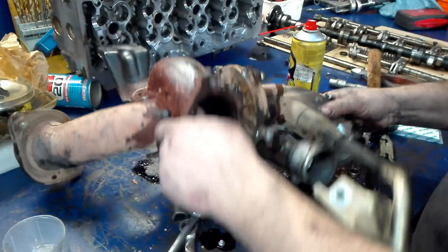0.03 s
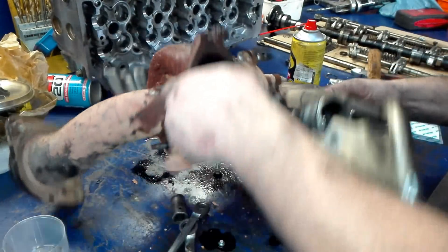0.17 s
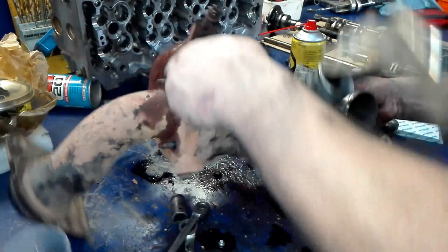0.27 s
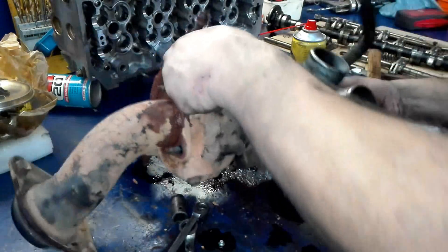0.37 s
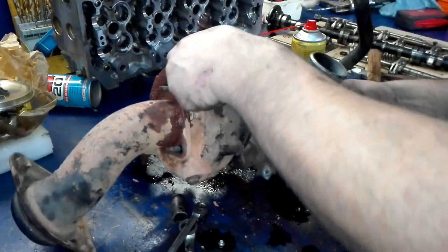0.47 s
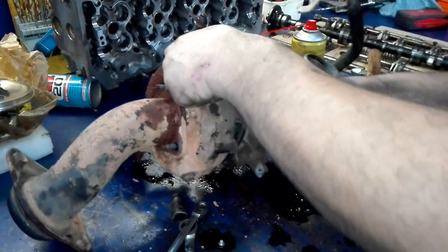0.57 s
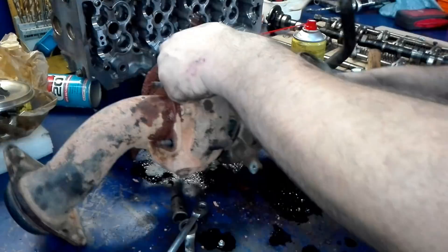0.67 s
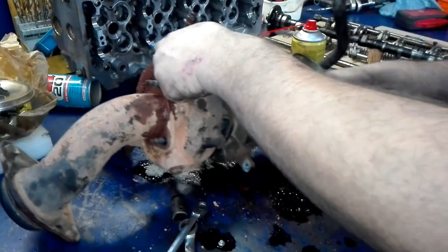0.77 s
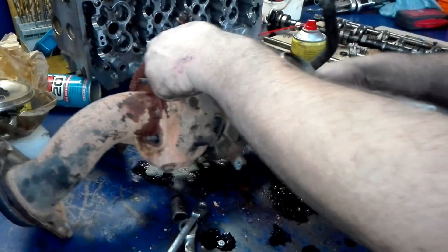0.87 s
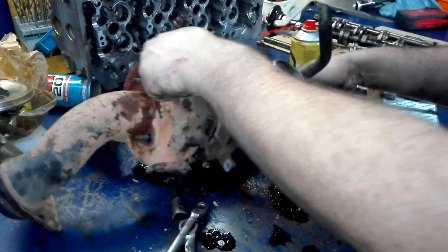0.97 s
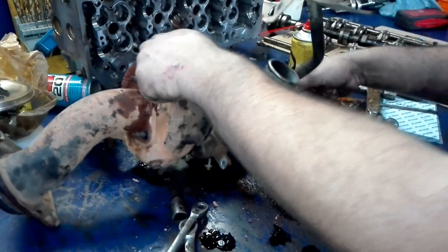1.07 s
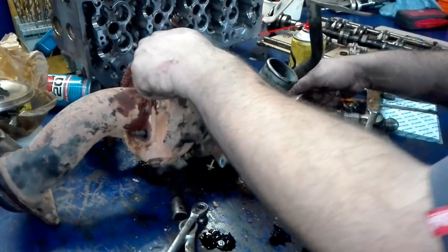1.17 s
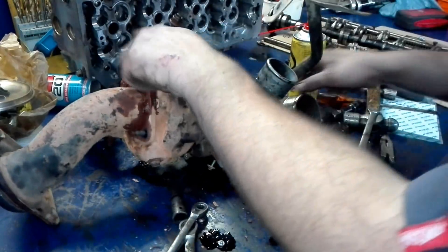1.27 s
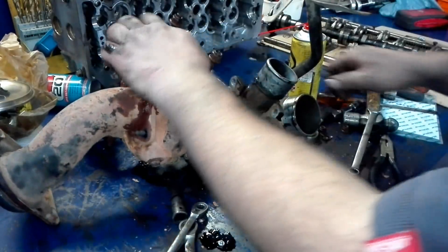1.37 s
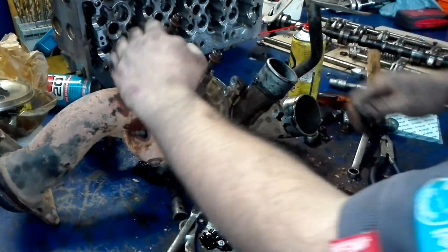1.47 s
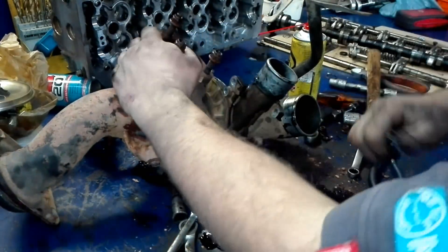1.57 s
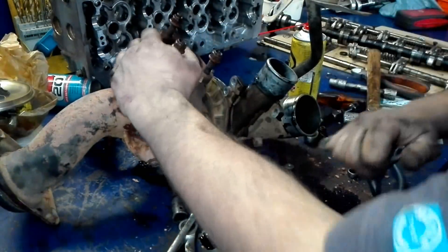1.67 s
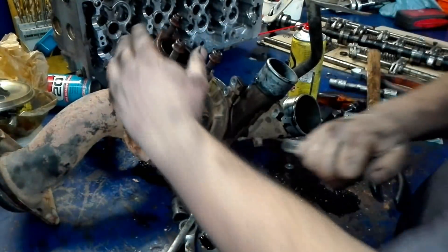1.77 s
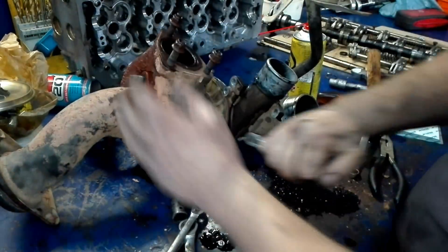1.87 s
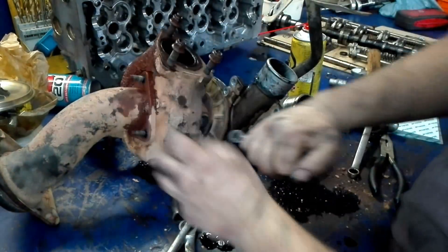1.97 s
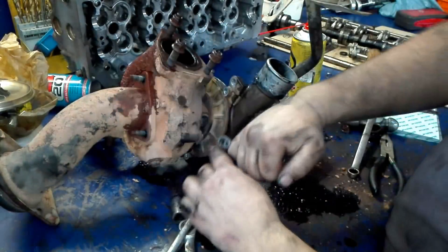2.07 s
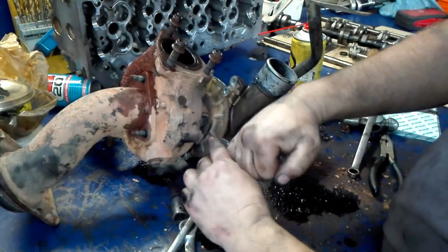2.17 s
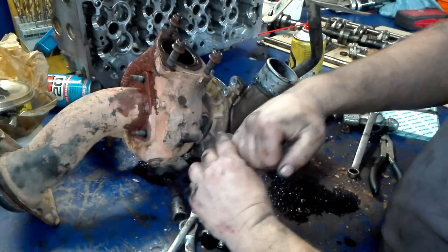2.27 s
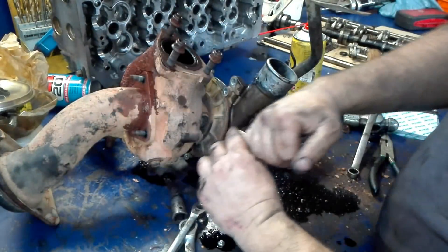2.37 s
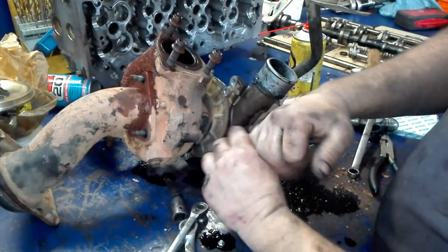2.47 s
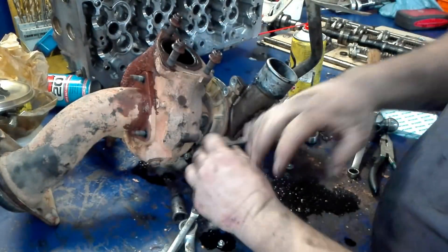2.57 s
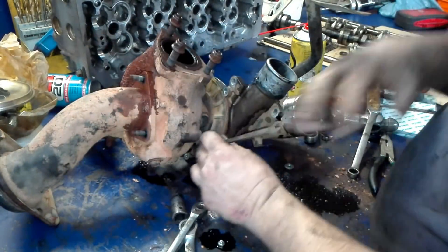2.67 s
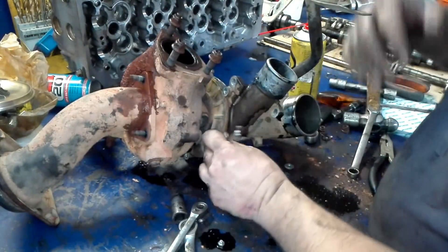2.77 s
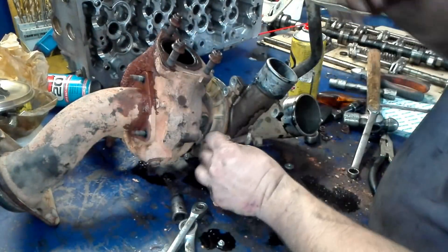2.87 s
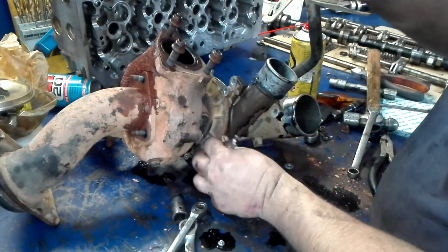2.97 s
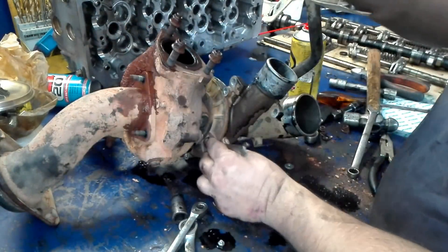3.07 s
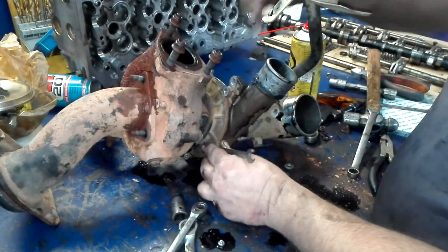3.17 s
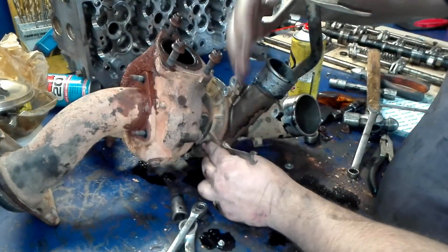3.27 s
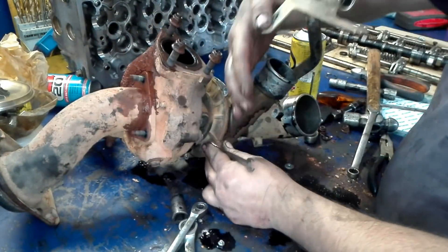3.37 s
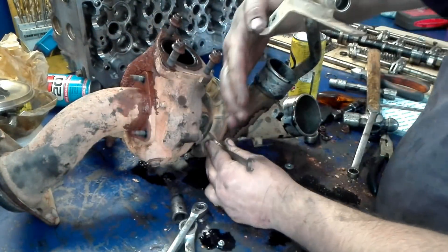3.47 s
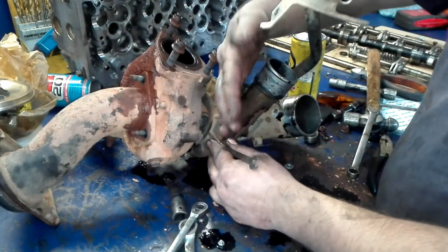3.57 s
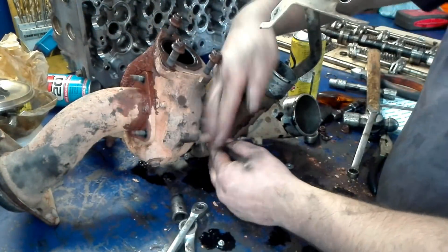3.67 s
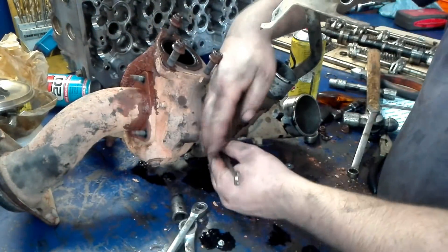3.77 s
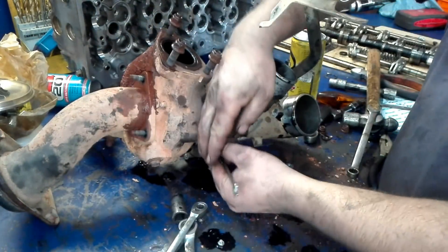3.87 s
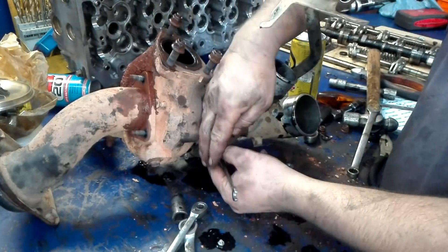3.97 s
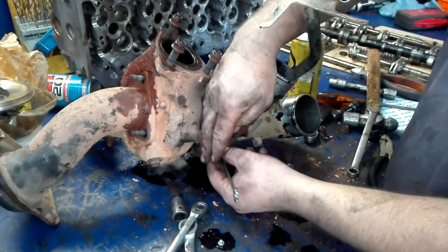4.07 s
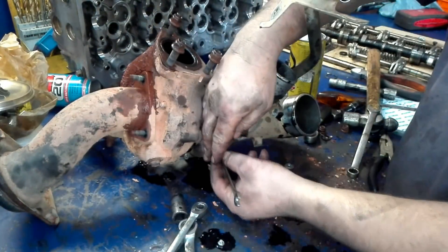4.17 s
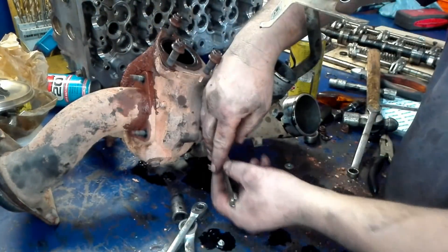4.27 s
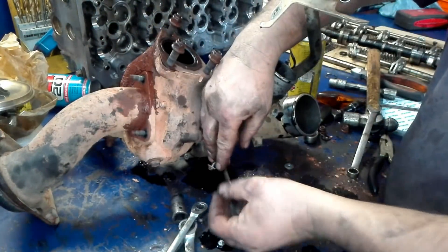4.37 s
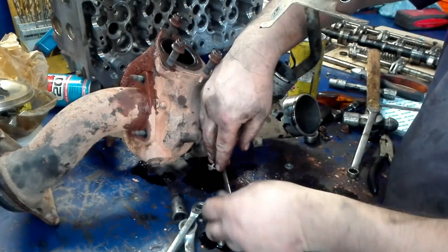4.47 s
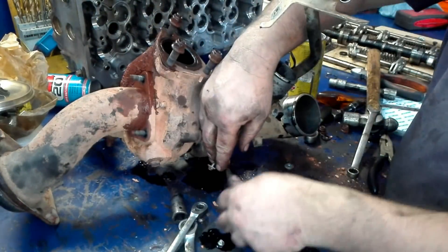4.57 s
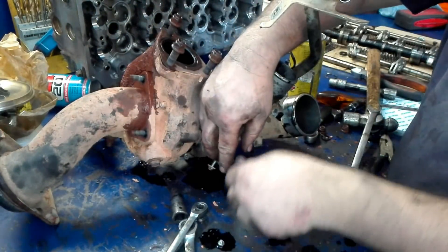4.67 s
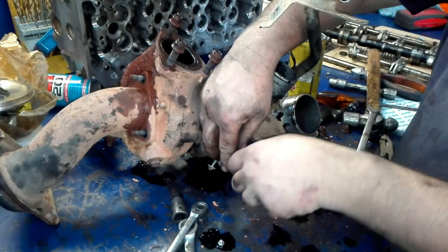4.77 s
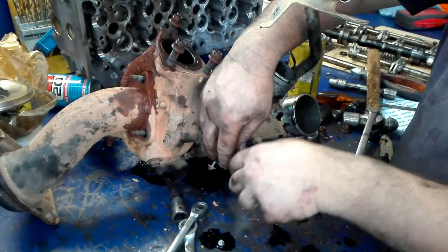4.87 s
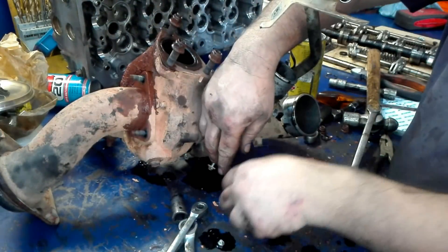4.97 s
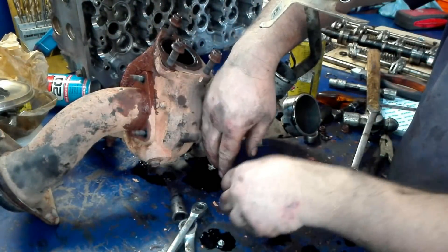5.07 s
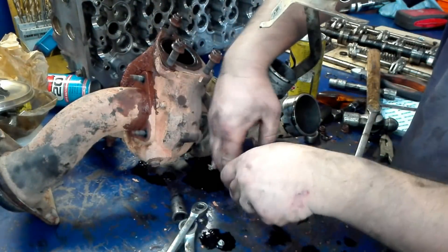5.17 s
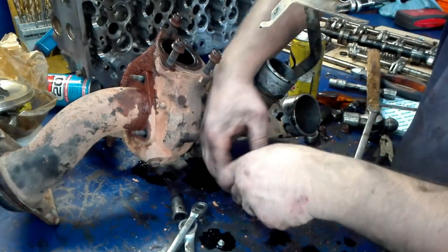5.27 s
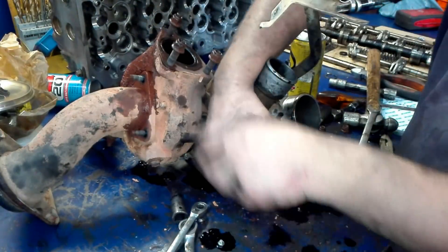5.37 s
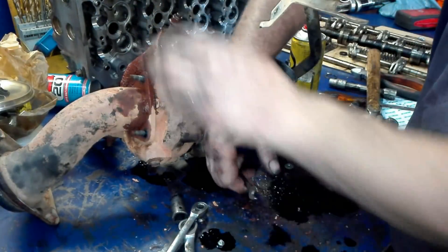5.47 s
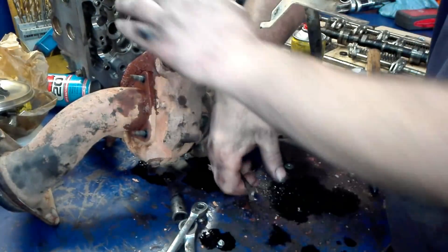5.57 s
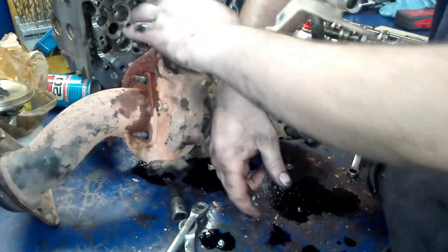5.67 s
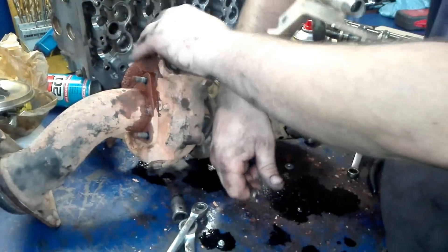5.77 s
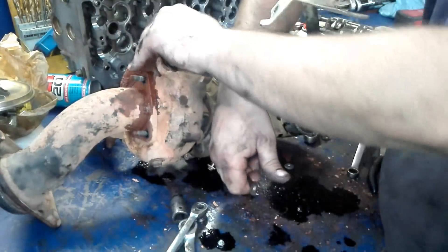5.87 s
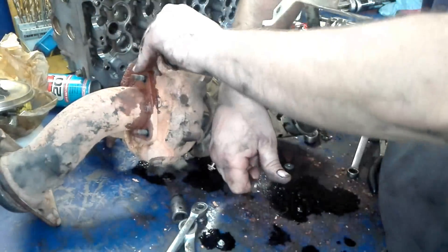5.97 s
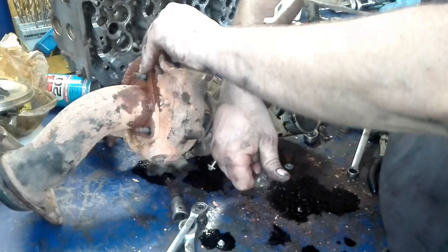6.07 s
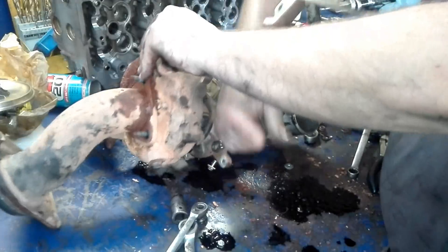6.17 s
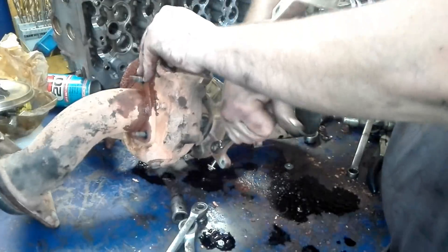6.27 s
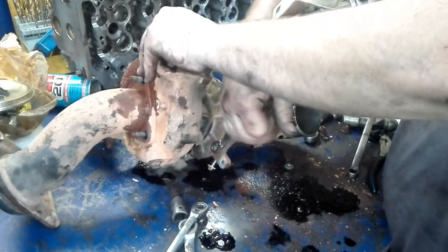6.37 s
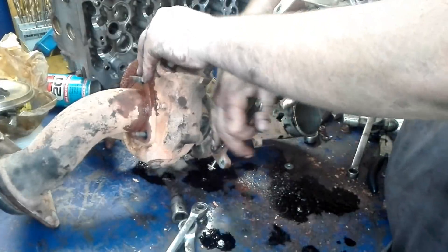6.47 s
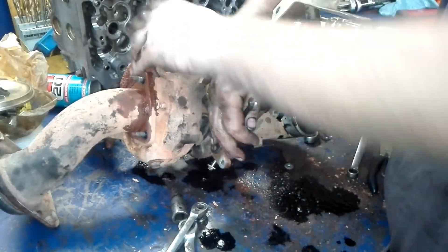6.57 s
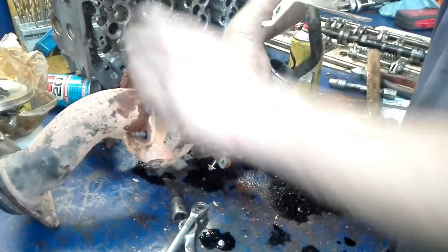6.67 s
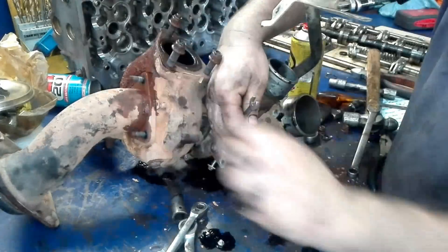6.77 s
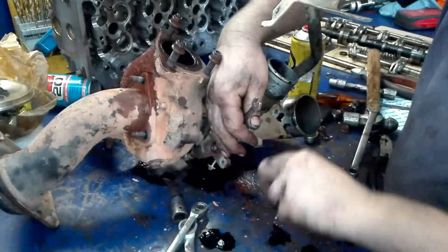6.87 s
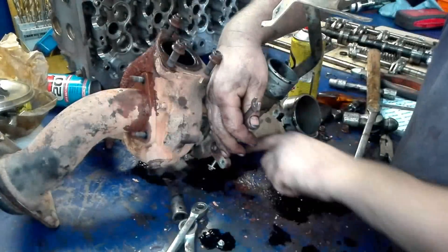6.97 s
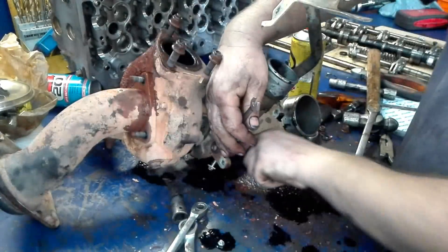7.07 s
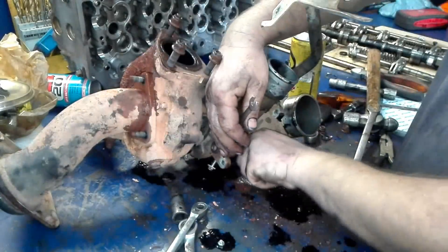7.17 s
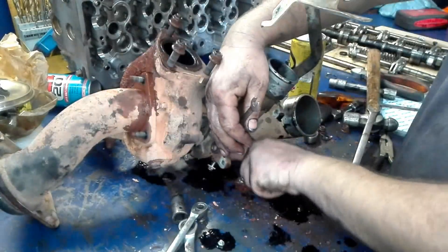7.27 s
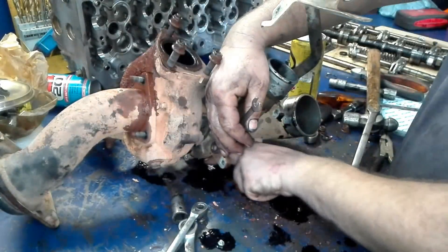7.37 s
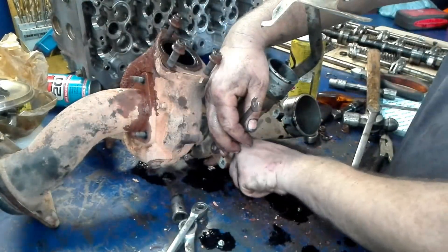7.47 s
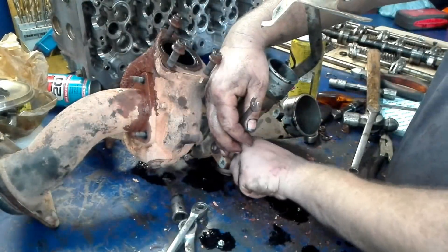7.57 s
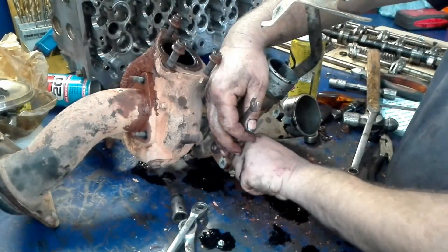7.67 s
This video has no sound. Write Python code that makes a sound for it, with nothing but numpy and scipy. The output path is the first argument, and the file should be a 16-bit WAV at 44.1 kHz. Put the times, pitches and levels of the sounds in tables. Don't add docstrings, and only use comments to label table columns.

```python
import sys
import numpy as np
from scipy import signal
from scipy.fft import rfft, irfft, next_fast_len
from scipy.io import wavfile
from scipy.ndimage import uniform_filter1d, map_coordinates

SR = 44100
rng = np.random.default_rng(int(sys.argv[2]) if len(sys.argv) > 2 else 0)


def linear_from_db(decibels):
    return 10 ** (np.asarray(decibels, float) / 20)


def pcm_store(signal):
    levels = np.round(np.clip(np.atleast_2d(signal), -1, 1) * 32767)
    wavfile.write(sys.argv[1], SR, levels.astype(np.int16).T)


N = 340893


def unit(x):
    return x / np.sqrt(np.mean(x ** 2) + 1e-20)


def along(points, hz):
    f, v = np.transpose(points)
    return np.interp(np.log(hz + 1), np.log(f + 1), v)


def filtered(x, response):
    m = next_fast_len(len(x) + SR // 4)
    spectrum = rfft(x, m) * response(np.fft.rfftfreq(m, 1 / SR))
    return irfft(spectrum, m)[:len(x)]


def body(modes, tilt_db=0):
    centre, width, db = np.transpose(modes)[..., None]
    sign = (-1) ** np.arange(len(centre))[:, None]
    gain = linear_from_db(db + np.reshape(tilt_db, (-1, 1))) * sign
    return lambda f: (gain * 1j * f * width / (centre * centre - f * f + 1j * f * width)).sum(axis=0)


def near(modes, hz, slope_db, scatter_db):
    octaves = np.abs(np.log2(np.array(modes)[:, 0] / hz))
    return -slope_db * octaves + scatter_db * rng.standard_normal(len(modes))


def add(track, s, sound, db):
    i = round(s * SR)
    scaled = linear_from_db(db) * sound / np.abs(sound).max()
    track[i:i + len(sound)] += scaled[:len(track) - i]


def patchy(x, depth_db):
    z = signal.stft(x, nperseg=512)[2]
    field = uniform_filter1d(rng.standard_normal(z.shape), size=8, axis=0)
    field = uniform_filter1d(field, size=16, axis=1)
    return signal.istft(z * linear_from_db(depth_db * unit(field)), nperseg=512)[1][:N]


def strikes(modes, hits, blur, broad_db):
    out, t = np.zeros(N), np.arange(SR) / SR
    ring, wide = body(np.array(modes) * [1, blur, 1]), body([(3950, 3400, broad_db)])
    for s, db, rise_s, t60 in hits:
        chatter = rng.standard_normal(len(t)) * linear_from_db(-60 * t / t60) * (1 - np.exp(-(t / rise_s) ** 2))
        add(out, s, filtered(chatter, lambda f: ring(f) + wide(f)), db)
    return out


# frequency in Hz, density in dB per Hz.
HUM = [(12, -34.5), (22, 6), (39, -4.5), (60, -2), (84, -13.5), (108, -11.5), (189, -14), (319, -22.5)]
# frequency in Hz, density in dB per Hz.
HISS = [(420, -26), (713, -28.5), (1140, -25.5), (1420, -26.5), (2220, -29.5), (13400, -37), (15000, -55)]


def air():
    sway_db, sway_t60_s, drift_db = -31, 0.36, 2
    t = np.arange(N) / SR
    noise = filtered(patchy(rng.standard_normal(N), depth_db=1.9), lambda f: linear_from_db(along(HUM + HISS, f)))
    noise = linear_from_db(-60) * unit(noise)
    low = filtered(noise, lambda f: 1 / (1 + (f / 110) ** 4))
    sway = np.zeros(N)
    for s, db, *_ in LANDINGS + NUDGES + SETDOWNS:
        sway += (t > s) * linear_from_db(db + sway_db - 60 * np.abs(t - s) / sway_t60_s)
    drift = map_coordinates(rng.standard_normal(40), [3 * t])
    wander = low * (linear_from_db(1.5 + drift_db * drift) - 1)
    return noise + wander + unit(low) * uniform_filter1d(sway, size=1500)


# frequency in Hz, decay by 60 dB in seconds.
SHOP = [(60, .55), (160, 0.75), (420, 0.62), (1300, 0.62), (2900, 0.67), (5000, .53), (7700, 0.29),
        (14000, 0.17)]


def shop(x, wet_db, gap_s):
    out, step = np.zeros(N + 2 * SR), int(.3 * SR)
    for i in range(0, N, step):
        hz, t, z = signal.stft(rng.standard_normal(SR), SR, nperseg=256)
        decay = linear_from_db(-60 * t / along(SHOP, hz)[:, None])
        tail = signal.istft(z * decay, SR, nperseg=256)[1][:SR]
        tail *= 1 - np.exp(-np.arange(SR) / SR / gap_s)
        wet = signal.fftconvolve(x[i:i + step], tail / np.linalg.norm(tail))
        out[i:i + len(wet)] += wet
    return linear_from_db(wet_db) * out[:N]


def scatter(x, wet_db):
    hz, t, z = signal.stft(x, SR, nperseg=256)
    power = np.abs(uniform_filter1d(np.abs(z) ** 2, size=5, axis=0))
    keep = linear_from_db(-120 * (t[1] - t[0]) / along(SHOP, hz))
    wash = np.array([signal.lfilter([0, 1 - k], [1, -k], row) for k, row in zip(keep, power)])
    noise = signal.stft(rng.standard_normal(N), SR, nperseg=256)[2]
    shaped = np.sqrt(wash / np.mean(np.abs(noise) ** 2)) * noise
    return linear_from_db(wet_db) * signal.istft(shaped, SR, nperseg=256)[1][:N]


# frequency in Hz, width in Hz, level in dB.
CLOTH = [(1252, 340, 1.5), (2395, 1000, -3.5), (5370, 4000, -6)]
# start in seconds, peak in dB, rise in seconds, decay by 60 dB in seconds.
RUSTLES = [
    (3.47, -58.5, 0.055, .9),
    (4.55, -62.5, 0.0496, .4),
    (5.13, -63.5, 0.076, .8),
    (5.58, -63.5, .06, .6),
    (6.7, -61, .05, .6),
]


def rustles():
    return patchy(strikes(CLOTH, RUSTLES, blur=0.56, broad_db=-18.5), depth_db=3.5)


# frequency in Hz, width in Hz, level in dB.
PIPE = [(710, 88.1, -2.5), (999, 84, -6), (1420, 140, -4), (1744, 88, -4), (2579, 102, -10.5),
        (3140, 97, -5.5), (4335, 90, -24), (5100, 80, -13.5), (6296, 240, -15.5), (7200, 131.2, -15)]
# start in seconds, peak in dB, rise in seconds, chatter decay by 60 dB in seconds.
PIPE_HITS = [
    (7.619, -24, .012, 0.12),
    (7.642, -28, .008, 0.15),
]


def pipe():
    return strikes(PIPE, PIPE_HITS, blur=1.6, broad_db=-13.5)


# frequency in Hz, width in Hz, level in dB.
THREAD = [(610, 31, -10), (1250, 33, 2), (2300, 88, 1), (4730, 550, -13)]
# start in seconds, peak in dB, rise in seconds, chatter decay by 60 dB in seconds.
THREAD_HITS = [
    (3.6, -54, 0.06, .6),
    (5.17, -57.5, 0.063, .4),
]


def thread():
    return strikes(THREAD, THREAD_HITS, blur=1.2, broad_db=-31.0)


# frequency in Hz, width in Hz, level in dB.
SOCKET = [(1420, 24, 4), (3443, 89, -6), (4458, 24, -3.5), (4630, 31.5, -4), (5100, 30, -18),
          (5968, 41, -4), (6925, 47, -4.5), (11060, 76, -21), (11360, 37, -15.5)]
# start in seconds, peak in dB, rise in seconds, chatter decay by 60 dB in seconds.
SOCKET_HITS = [
    (3.934, -26, 0.003, 0.03),
]


def socket():
    return strikes(SOCKET, SOCKET_HITS, blur=1.7, broad_db=-16)


# frequency in Hz, width in Hz, level in dB.
SPANNER = [(390, 19, -5.5), (1398, 32, 6), (1710, 22, -10), (2720, 19, -21.5), (3343, 20, -7),
           (4280, 76, -12), (4640, 35, -14.5), (5210, 24, -17), (6200, 320, -22.5)]
# start in seconds, peak in dB, rise in seconds, chatter decay by 60 dB in seconds.
SPANNER_HITS = [
    (2.953, -35, 0.00095, 0.037),
    (3.222, -45, .002, 0.039),
    (4.742, -49, 0.0026, 0.078),
]


def spanner():
    return strikes(SPANNER, SPANNER_HITS, blur=1.44, broad_db=-29.5)


# frequency in Hz, width in Hz, level in dB.
FLANGE = [(1143, 11, -8), (1300, 10, -5), (1376, 5.2, -2), (1435, 9.4, 0.5), (1603.5, 11, -8.5),
          (2130, 16, -14.5)]
# start in seconds, peak in dB, rise in seconds, chatter decay by 60 dB in seconds.
FLANGE_HITS = [
    (0.432, -22.5, 0.003, .1),
    (1.034, -24, .002, .1),
    (5.9, -40, .002, .15),
    (6.215, -17, .002, .15),
]


def flange():
    return strikes(FLANGE, FLANGE_HITS, blur=0.71, broad_db=-40.5)


# start in seconds, peak in dB, frequency in Hz, rise in seconds, decay by 60 dB in seconds.
RINGS = [(5.739, -27.5, 226, .01, .06), (6.222, -11.5, 226, .015, .2), (6.217, -19, 445, .008, 0.092),
         (0.465, -22, 1480, .004, .08), (6.24, -25.5, 1450, .006, .14), (0.28, -23.5, 226, .03, .6),
         (1.2, -30, 226, 0.012, 0.23), (5.909, -26.5, 48, .004, .3), (6.19, -33.5, 230, .004, .06),
         (6.18, -48, 5050, .002, .018), (6.196, -48, 5200, .002, .016), (2.954, -40.5, 1392, 0.0016, 0.12),
         (2.958, -51, 517, .003, .12), (3.223, -52, 1300, 0.0027, 0.11), (3.186, -61, 1300, .01, 0.22),
         (7.624, -34, 710, .005, 0.066), (7.626, -35.5, 1740, 0.0046, .07),
         (5.742, -49, 1300, 0.0037, 0.12), (0.311, -22, 1250, .003, .04), (0.362, -20, 1350, .003, .05),
         (0.432, -12, 190, .006, .12), (0.07, -35, 1550, .01, .2), (0.025, -36, 1100, .015, .3),
         (5.76, -42, 330, .01, .2), (4.05, -47, 340, 0.0042, .2), (3.936, -43.5, 1417, 0.0025, 0.18),
         (6.216, -21, 3420, .002, .06), (6.217, -24, 630, .004, .1), (0.262, -33, 2790, .005, .15),
         (3.888, -43.5, 336, .004, .12)]


def rings():
    out, t = np.zeros(N), np.arange(SR // 2) / SR
    for s, db, hz, rise_s, t60 in RINGS:
        fade = linear_from_db(-60 * t / t60) * (1 - np.exp(-(t / rise_s) ** 2))
        add(out, s, np.sin(2 * np.pi * hz * t) * fade, db)
    return out


# frequency in Hz, width in Hz, level in dB.
BOLT = [(3903, 440, -10.5), (4680, 200, 0.5), (5500, 300, -8.5), (6900, 280, 3), (8500, 500, -8.5),
        (10300, 600, 2), (11050, 450, -2.5), (12500, 1100, -9.5)]
# start in seconds, low mode peak in dB,
# middle modes in dB relative to it, top modes in dB relative to it.
TICKS = [(0.7725, -34, 7, 2), (0.7822, -25, 2.5, 3.5), (0.7946, -38, -2, -11), (0.993, -36, 20, 14),
         (1.0125, -27, 0.5, 10.5), (1.0272, -18.5, -7.5, -11.5), (3.9341, -33.5, -4, -24),
         (4.764, -60, 11.5, -3.5), (5.019, -40, 0, 1.5), (5.0488, -39.5, -4.5, -5),
         (6.2295, -16.5, -8.5, 5.5)]


def ticks():
    out, t = np.zeros(N), np.arange(SR // 8) / SR
    for s, db, middle_db, top_db in TICKS:
        chatter = rng.standard_normal(len(t)) * linear_from_db(-60 * t / 0.023) * (1 - np.exp(-t / 0.00078))
        for modes, level_db in ((BOLT[:3], db), (BOLT[3:5], db + middle_db), (BOLT[5:], db + top_db)):
            add(out, s, filtered(chatter, body(modes)), level_db + 0.5)
    return out


def harder(db):
    return 1280 * 2 ** (0.03 * (db + 9))


# frequency in Hz, width in Hz, level in dB.
STEEL = [(2742, 170, -7), (3320, 170, 5), (3700, 160, -5), (4180, 75, 0.5), (4750, 20, -6), (5300, 290, 1),
         (5830, 220, 0), (6820, 150, 5.5), (8200, 900, -9), (9630, 470, -7.5), (10200, 370, -9.5),
         (10800, 1800, -17.5)]
# frequency in Hz, width in Hz, level in dB.
CASTING = [(734, 90, -13.5), (1063, 150, -3), (1165, 25, -2), (1311, 53, 5.5), (1405, 42, 3),
           (1705, 260, -8), (2070.5, 90, -20)]


def contacts(table, cast_hz_of, t60, detune, blur, own_db, broad_db, slope_db, rise_s):
    out, t = np.zeros(N), np.arange(SR // 4) / SR
    fade = linear_from_db(-60 * t / max(t60, .003)) * (1 - np.exp(-t / rise_s))
    for s, db, cast_db, hz in table:
        cast_peak_db = db + cast_db
        pieces = ((STEEL, hz, db), (CASTING, cast_hz_of(cast_peak_db), cast_peak_db))
        for modes, centre_hz, level_db in pieces:
            chatter = rng.standard_normal(len(t)) * fade
            shift = np.exp(detune * rng.standard_normal((len(modes), 1)) * [1, 0, 0])
            modes = np.array(modes) * shift * [1, blur, 1]
            ring = body(modes, near(modes, centre_hz, slope_db, scatter_db=3))
            own = body([(centre_hz, centre_hz / 30, own_db)])
            wide = body([(centre_hz, centre_hz, broad_db)])
            sound = filtered(chatter, lambda f: ring(f) + own(f) + wide(f) / (1 + 1j * f / centre_hz))
            add(out, s, sound, level_db)
    return out


# start in seconds, steel peak in dB,
# casting in dB relative to steel, brightest frequency in Hz.
TAPS = [(0.3113, -28.5, 8.5, 3600), (0.3625, -20.5, 5, 3820), (0.7146, -42, 15, 3610),
        (1.5506, -49, -15, 8530), (2.1574, -56.5, 0, 2905), (3.0994, -56, -17.5, 5210),
        (3.2, -52.5, -8, 3490), (3.4994, -60.5, 3, 4775), (3.615, -70, 4, 2300), (4.2123, -54, -1.5, 6200),
        (4.3184, -53.5, 1, 3125), (4.7392, -52, -7.5, 3920), (4.7633, -42.5, -12.5, 6744),
        (6.5844, -50, -12.5, 4970)]


def taps():
    return contacts(TAPS, lambda db: 1420, t60=0.052, detune=0.021, blur=0.95,
                    own_db=-2, broad_db=-6.5, slope_db=10.5, rise_s=0.00061)


# start in seconds, steel peak in dB,
# casting in dB relative to steel, brightest frequency in Hz.
JOLTS = [(0.028, -33.5, 2, 5300), (0.066, -25, -9, 5205), (0.1503, -29, -10, 6720),
         (0.1944, -30.5, -1.5, 3005), (0.2204, -31, -7, 3622), (0.2634, -22.5, -9.5, 2792),
         (0.3342, -22.5, -4, 6735), (0.3894, -29.5, -3.5, 6032), (0.6214, -28, -7.5, 3599),
         (0.6474, -31.5, -2.5, 3140), (0.6684, -29, -5.5, 3454), (0.7146, -33.5, 5, 3550),
         (0.741, -32, 5, 3503), (0.754, -24, 4, 2726), (0.7748, -24, -8.5, 2796), (0.7804, -14, -9.5, 5430),
         (0.7962, -23.5, -2, 3320), (0.9177, -31.5, 2.5, 3260), (0.9507, -34, -3.5, 2892),
         (0.9887, -16, 0.5, 3066), (1.0898, -16.5, 4, 3368)]
KNOCKS = [
    (3.885, -58, 11, 2630),
    (4.051, -63, 15, 2650),
    (5.7411, -44, -0.5, 6420),
    (5.7816, -38.5, -6.5, 6670),
    (5.8306, -45.5, -9.5, 6100),
    (5.898, -42, 8, 2660),
    (6.0982, -54, 8.5, 6925),
    (6.181, -54.5, -11.5, 5100),
    (6.197, -51, 5, 5100),
]


def jolts_and_knocks():
    return contacts(JOLTS + KNOCKS, harder, t60=0.069, detune=.03, blur=1.5,
                    own_db=-7.0, broad_db=1.5, slope_db=5, rise_s=0.0023)


# start in seconds, steel peak in dB,
# casting in dB relative to steel, brightest frequency in Hz.
BLOWS = [(0.313, -16, -4, 5500), (0.364, -17, -3, 4200), (0.371, -20, -2, 5300), (0.4312, -1, -3, 6800),
         (0.4395, -5.5, 0, 5500), (0.452, -10, -1, 4500), (0.464, -11, 1.5, 6800), (0.473, -13, 2, 3700),
         (0.481, -14, 3, 2797), (0.5, -17, -1, 3400), (0.9955, -8.5, 1.5, 6800), (1.012, -9, 0.5, 6800),
         (1.022, -12, 2, 4100), (1.029, -9, 1, 5400), (1.036, -9, 3, 3699), (1.047, -11, 3, 6200),
         (1.056, -12, 1, 3200), (1.066, -11, 2, 2595), (1.072, -10.5, -3, 6000), (6.2155, -6, -2, 3408),
         (6.2278, -4.5, -4, 6800), (6.2552, -14, -1, 6000), (6.262, -17, 0, 6306), (6.286, -22, 0.5, 5500)]


def blows():
    return contacts(BLOWS, harder, t60=0.044, detune=0.022, blur=1.6,
                    own_db=-6.5, broad_db=2.5, slope_db=2.5, rise_s=0.0011)


# frequency in Hz, width in Hz, level in dB.
BENCH = [(42, 16, -11.5), (61.42, 18, 3.5), (99.36, 18, -1.5), (119, 11, 2.5), (155.5, 20, -3.5),
         (222.3, 15, 5)]
# frequency in Hz, width in Hz, level in dB.
PANEL = [(336, 110, -3), (467, 77, -3), (606, 150, -7), (826, 87, -7)]


def thumps(table, t60):
    out, t = np.zeros(N), np.arange(SR // 2) / SR
    push = np.exp(-t / 0.00038) * (1 - np.exp(-t / 0.00071))
    fade = linear_from_db(-60 * t / max(t60, .02))
    for s, db, hz, knock_db in table:
        rocking = push + 0.081 * rng.standard_normal(len(t)) * linear_from_db(-60 * t / 0.15)
        bench = body(BENCH, near(BENCH, hz, slope_db=13, scatter_db=1.5))
        boom = filtered(rocking, lambda f: bench(f) / (1 + 1j * f / 300) * (1j * f / (45 + 1j * f)) ** 2)
        tone = .45 * np.sin(2 * np.pi * hz * t)
        add(out, s, fade * (boom / np.abs(boom).max() + tone), db - 3.0)
        rattle = rng.standard_normal(len(t)) * linear_from_db(-60 * t / .12) * (1 - np.exp(-t / .0025))
        panel = body(PANEL, 3 * rng.standard_normal(len(PANEL)))
        wide = body([(920, 1100, 0.1)])
        add(out, s, filtered(rattle, lambda f: panel(f) + linear_from_db(-13) * wide(f) ** 2), db + knock_db + 2.5)
    return out


# start in seconds, peak in dB, strongest frequency in Hz,
# panel knock in dB relative to the peak.
NUDGES = [(2.749, -48, 56.5, -14), (2.954, -44.5, 218.6, -5), (3.229, -55, 45.5, -0.5),
          (3.546, -36, 109, -17), (3.607, -35.5, 143.5, -16), (3.885, -32.5, 141.4, -9.5),
          (3.937, -33.5, 102.3, -10), (4.045, -36.5, 141.5, -6), (4.598, -43.5, 45.9, -17),
          (4.752, -50.5, 213.6, -14), (5.12, -45.5, 141.6, -14), (5.198, -45.5, 68, -15),
          (5.493, -43, 138.7, -14.5), (5.61, -38, 29.9, -39.5), (6.619, -51.5, 45.25, -26)]


def nudges():
    return thumps(NUDGES, t60=0.49)


SETDOWNS = [
    (5.738, -32.5, 160, -5.5),
    (5.898, -20, 156, -7.5),
    (6.215, -6, 55, -6),
    (6.218, -11.5, 110, -7.5),
    (6.229, -13, 95, -8.5),
]


def setdowns():
    return thumps(SETDOWNS, t60=.17)


LANDINGS = [(0.076, -13, 222.4, -20), (0.152, -20.5, 235, -12), (0.186, -21.5, 242.7, -5.5),
            (0.269, -19, 87, -27.5), (0.319, -19.5, 207, -7.5), (0.432, -1.5, 62, -12.5),
            (0.46, -7.5, 61, -3.5), (0.589, -19, 75.1, -25.5), (0.719, -18.5, 131.1, -12.5),
            (0.76, -7.5, 118.7, -12.5), (0.78, -14, 95, -7), (0.848, -23, 53.23, -29),
            (0.917, -16.5, 113.9, -8), (0.995, -1.5, 122.8, -9), (1.015, -5, 95, -8),
            (1.034, -4.5, 119, -9.5), (1.058, -7, 58.1, -12), (1.045, -8.5, 226.4, -15),
            (1.089, -9.5, 56.7, -5.5)]


def landings():
    return thumps(LANDINGS, t60=.3)


# time in seconds, pressure in dB.
DRAG = [
    [(0.0, -44), (0.05, -39), (0.11, -42), (0.15, -37), (0.23, -35.5), (0.28, -29.5), (0.34, -29),
     (0.39, -34), (0.43, -34.5)],
    [(0.431, -36), (0.56, -42), (0.62, -41), (0.69, -45), (0.77, -38), (0.88, -46), (0.93, -39.5),
     (0.99, -40)],
    [(0.991, -40), (1.12, -48), (1.2, -46.5), (1.4, -52.5), (1.5, -67.5)],
    [(3.5, -69.5), (3.62, -63.5), (3.8, -80)],
    [(5.88, -70.5), (5.93, -58), (6.09, -58), (6.19, -63)],
]


def scrape():
    hz, t, z = signal.stft(rng.standard_normal(N), SR, nperseg=1024)
    pressure_db = np.max([np.interp(t, *np.transpose(rows), -120, -120) for rows in DRAG], axis=0)
    over_db = 40 + pressure_db
    octaves = np.log2((hz[:, None] + 1) / 520) - .07 * over_db
    shaped = z * linear_from_db(-33 + over_db) / (1 + (octaves / .35) ** 2)
    return patchy(signal.istft(shaped, SR, nperseg=1024)[1][:N], depth_db=3)


def drag():
    out, t = np.zeros(N), np.arange(N) / SR
    # modes, level in dB at a pressure of -40 dB, dB gained per dB of pressure, broad resonance
    layers = ((STEEL, -47.5, 1.4, (6000, 8000, -2)),
              (CASTING, -43, .8, (1100, 1200, 1)),
              (BENCH + PANEL[:2], -38.5, .9, (150, 250, -10)))
    for modes, base_db, grows, wide in layers:
        sizes = np.clip(rng.standard_normal(N // 300 + 1), -2, 2)
        grains = rng.standard_normal(N) * linear_from_db(4.4 * np.repeat(sizes, 300)[:N])
        sound = unit(filtered(grains, lambda f: body(modes)(f) + body([wide])(f)))
        for rows in map(np.array, DRAG):
            level_db = base_db + grows * (rows[:, 1] + 40)
            out += sound * linear_from_db(np.interp(t, rows[:, 0], level_db, -120, -120))
    return out * np.minimum(t / 0.012, 1)


def hushed(x, over_db, steep):
    hz, t, z = signal.stft(x, SR, nperseg=512)
    power = uniform_filter1d(np.abs(z) ** 2, size=9, axis=0)
    power = np.abs(uniform_filter1d(power, size=3, axis=1))
    floor = linear_from_db(2 * (along(HUM + HISS, hz) + over_db))[:, None]
    gain = 1 / (1 + (floor / (power + 1e-20)) ** steep)
    return signal.istft(z * gain, SR, nperseg=512)[1][:N]


# frequency in Hz, gain in dB.
MIC = [(20, 1.5), (8000, -1.5), (11000, -7), (13000, -9.5), (15000, -7)]


def scene():
    heavy = jolts_and_knocks() + blows() + landings() + nudges() + setdowns() + drag() + pipe()
    light = taps() + spanner() + socket() + thread()
    heavy, light = (filtered(x, lambda f: linear_from_db(along(MIC, f))) for x in (heavy, light))
    heavy, light = heavy + scrape(), light + ticks()
    clear = rings()
    sent = heavy + linear_from_db(-5.0) * light + linear_from_db(-9) * clear
    bass = filtered(sent, lambda f: 1 / (1 + (f / 450) ** 4))
    hall = shop(bass, wet_db=-10.0, gap_s=0.0008) + scatter(sent - bass, wet_db=-7.5)
    loud = hushed(heavy + light + clear + hall, over_db=-55, steep=0.74)
    return np.tile(loud + flange() + rustles() + air(), (2, 1))


def low_pass(x):
    return signal.sosfilt(signal.butter(12, 15470, fs=SR, output="sos"), x)


# frequency in Hz, share of bands with separate noise per side.
LOOSE = [(4300, 0), (5500, 0.12), (7000, .6), (10000, 0.7), (14000, .7)]


def record(dry):
    mid = np.clip(filtered(dry[0], lambda f: f < 14400), -1, 1)
    hz, t, z = signal.stft(mid, SR, nperseg=1024)
    band = (np.log(hz + 1) * 9).astype(int)
    draw = rng.random((band.max() + 1, len(t) // 2 + 1)).repeat(2, axis=1)
    loose = draw[band, :len(t)] < along(LOOSE, hz)[:, None]
    power = np.abs(z) ** 2
    treble = power[hz > 4000].sum(axis=0)
    loose &= treble < 30 * np.roll(treble, 2)
    size = np.sqrt(np.abs(uniform_filter1d(power, size=12, axis=0)))
    noise = signal.stft(rng.standard_normal(N), SR, nperseg=1024)[2]
    noise = noise / np.sqrt(np.mean(np.abs(noise) ** 2))
    side = signal.istft(linear_from_db(-3.5) * loose * size * noise, SR, nperseg=1024)[1][:N]
    return low_pass(np.array([mid + side, mid - side]))


dry = scene()
out = record(dry)
pcm_store(out)
```